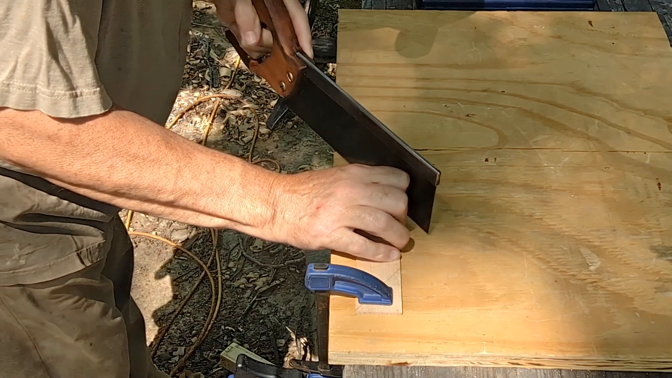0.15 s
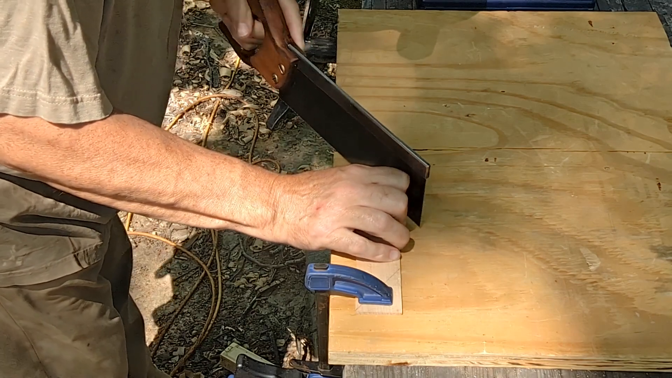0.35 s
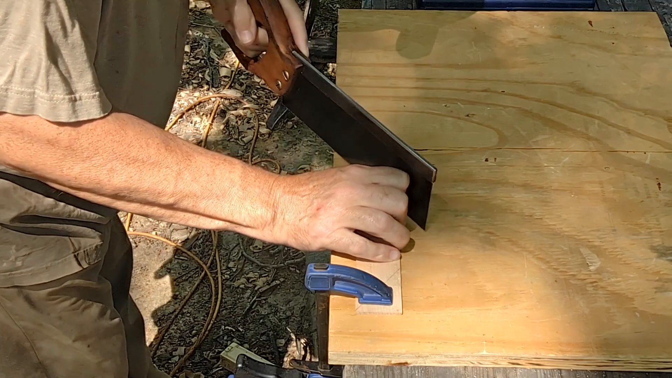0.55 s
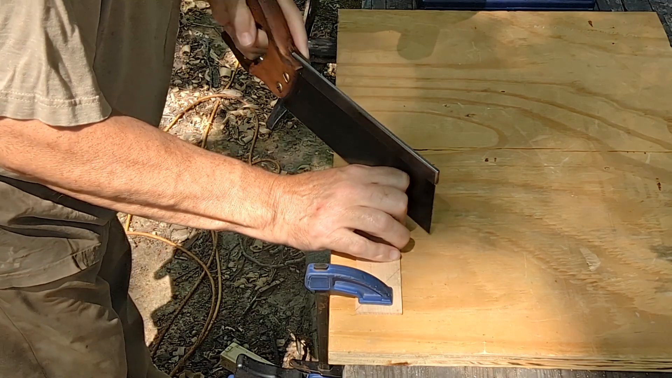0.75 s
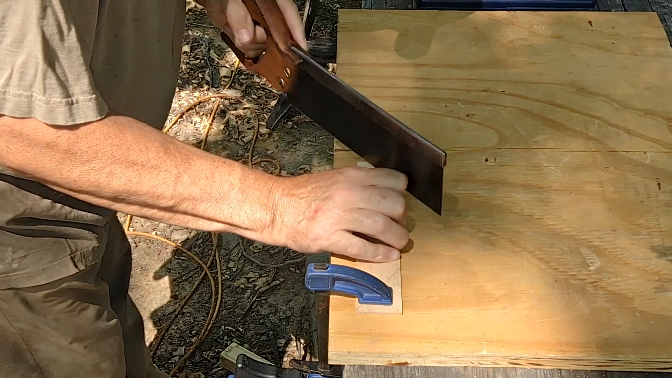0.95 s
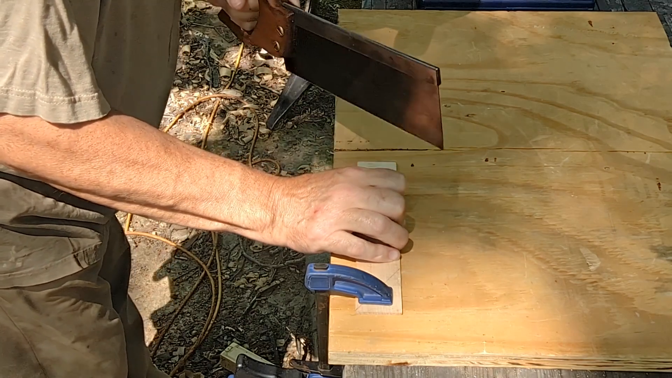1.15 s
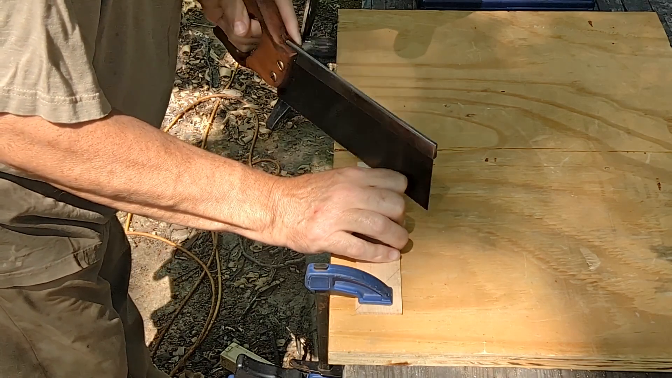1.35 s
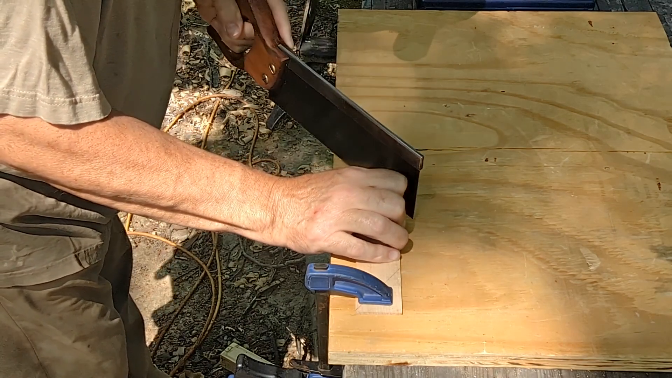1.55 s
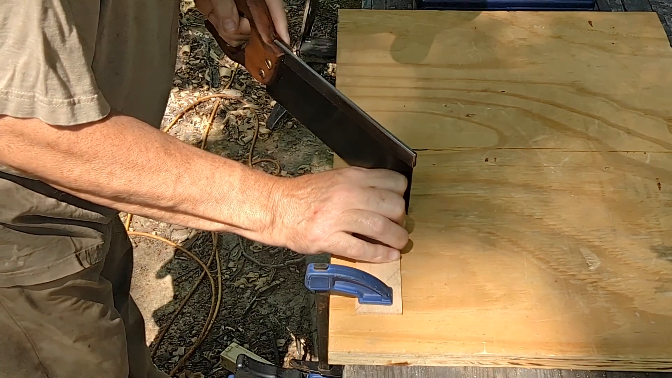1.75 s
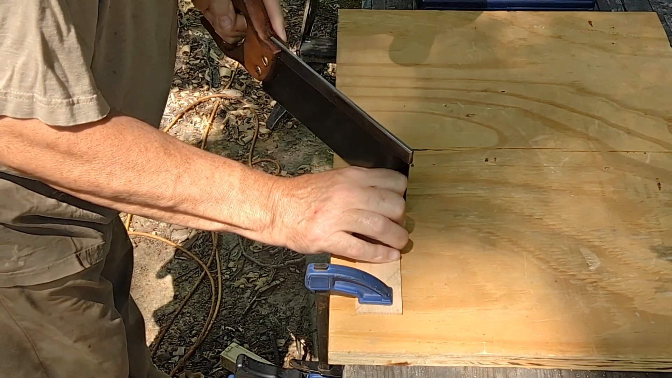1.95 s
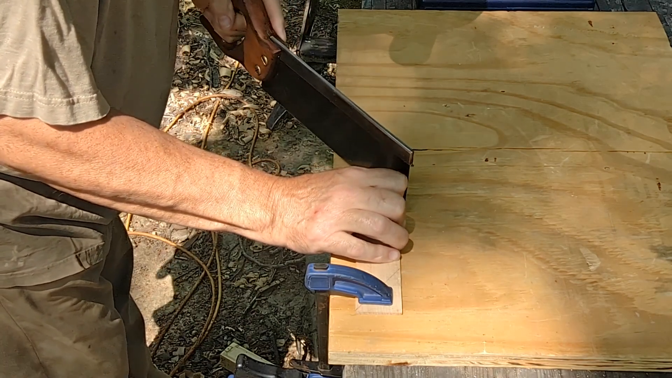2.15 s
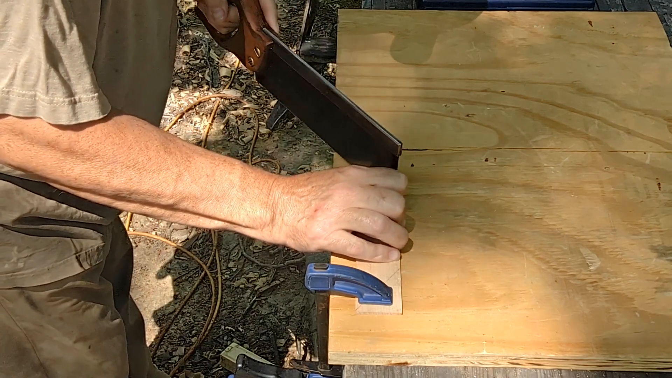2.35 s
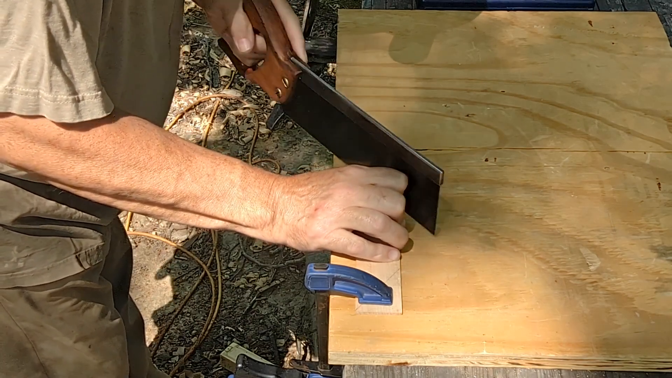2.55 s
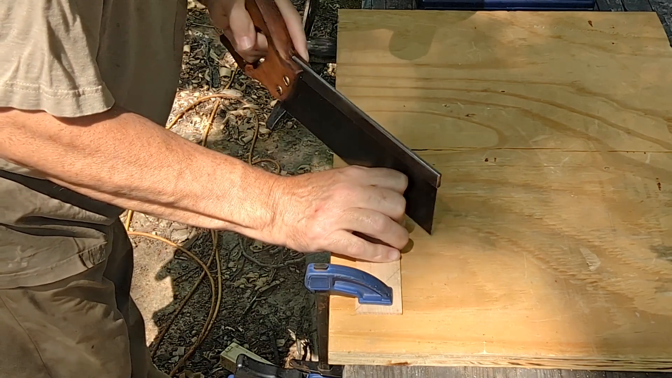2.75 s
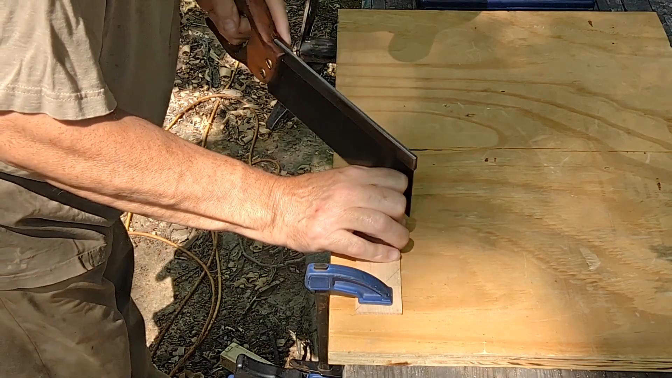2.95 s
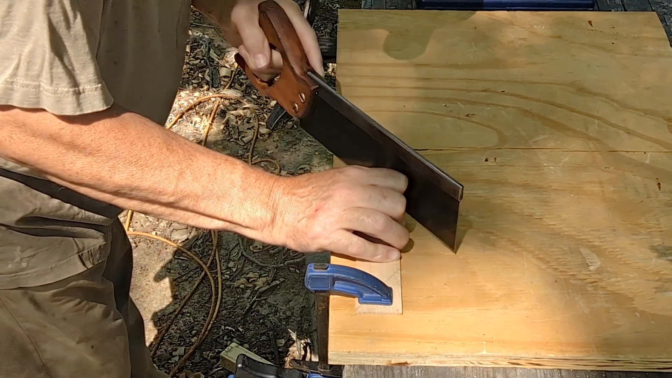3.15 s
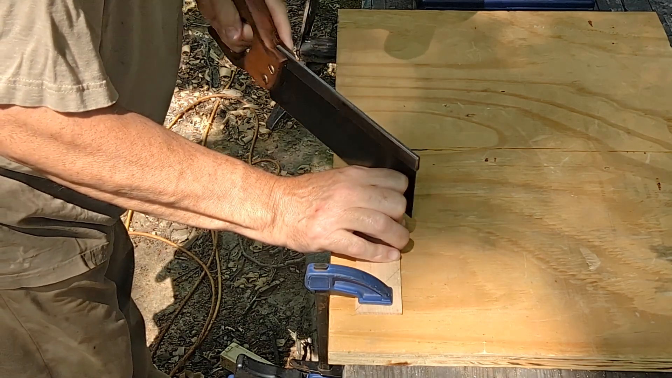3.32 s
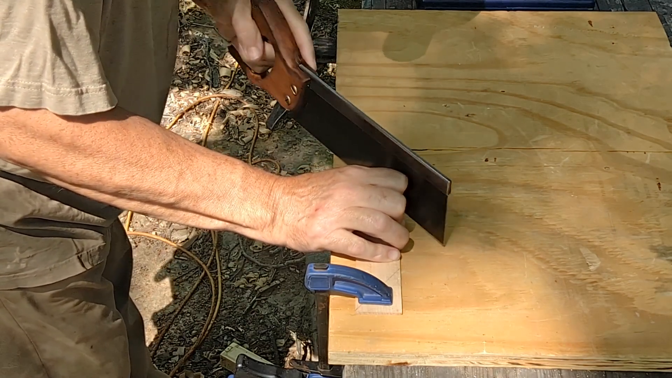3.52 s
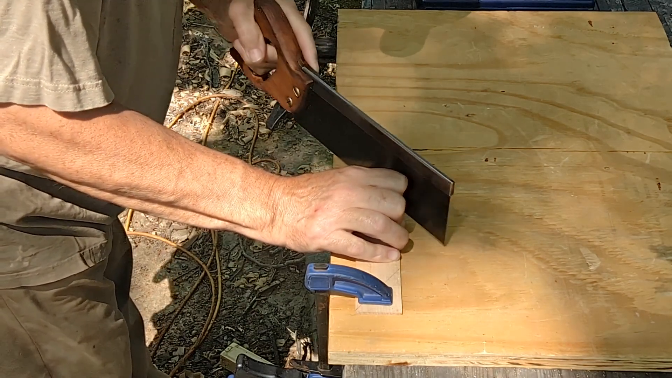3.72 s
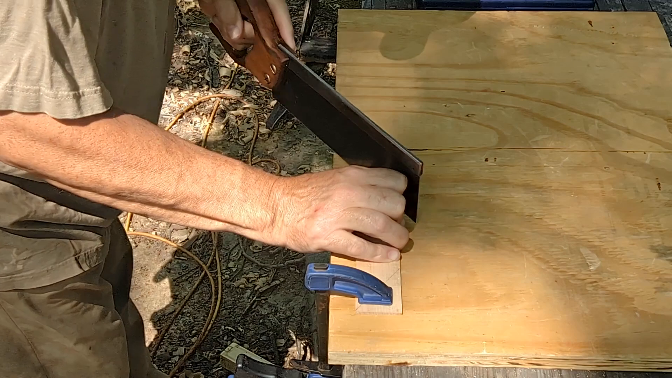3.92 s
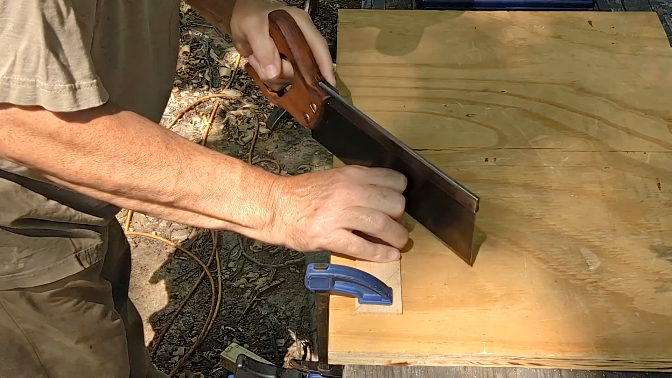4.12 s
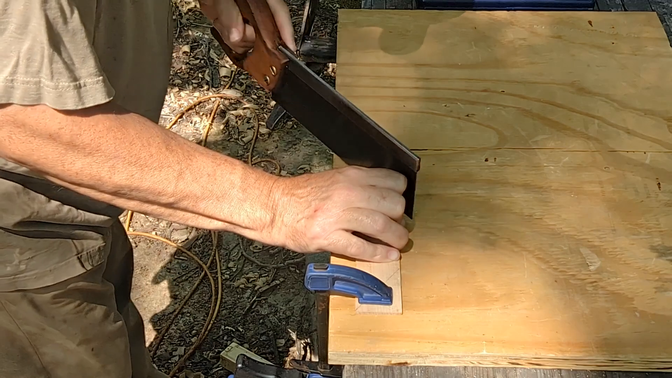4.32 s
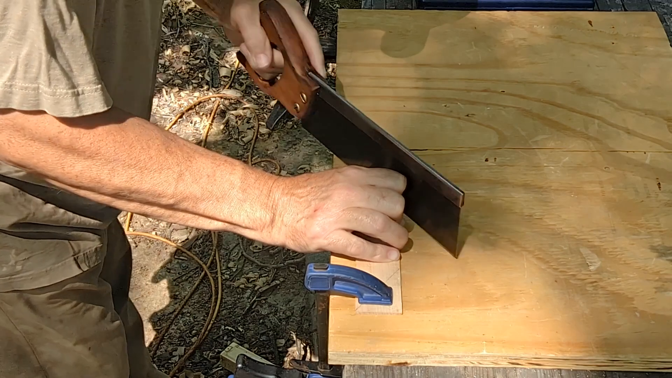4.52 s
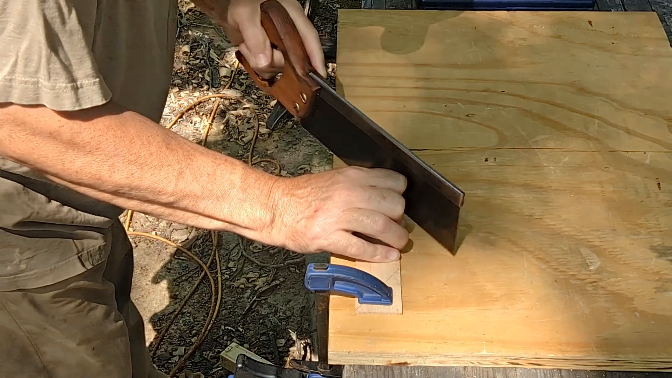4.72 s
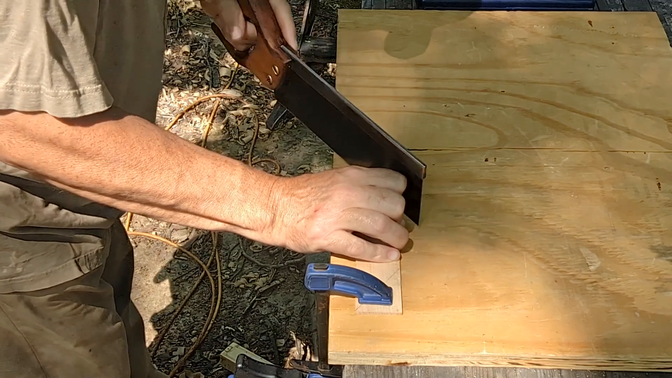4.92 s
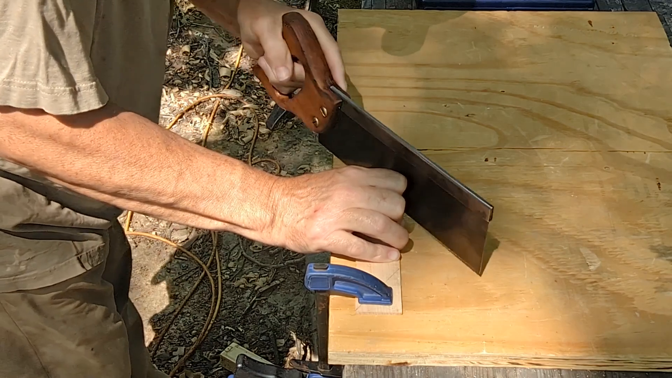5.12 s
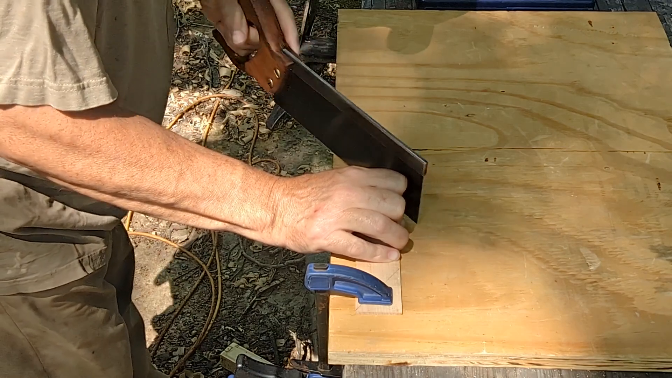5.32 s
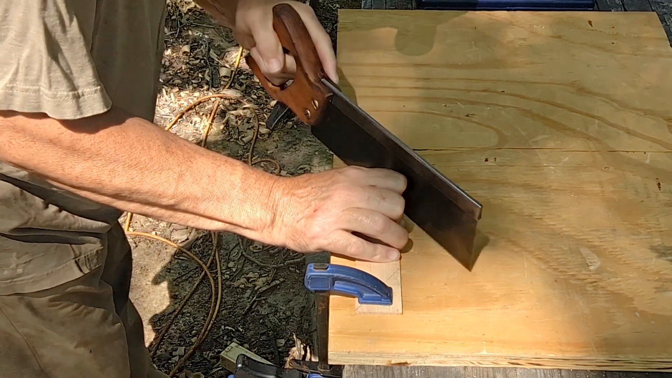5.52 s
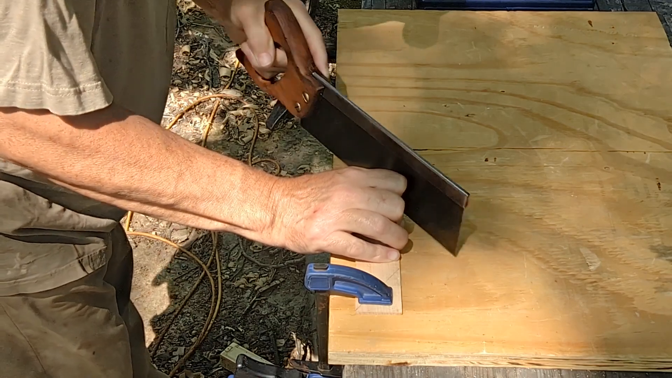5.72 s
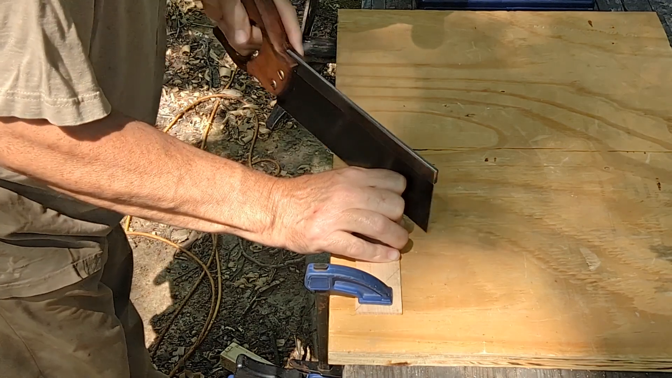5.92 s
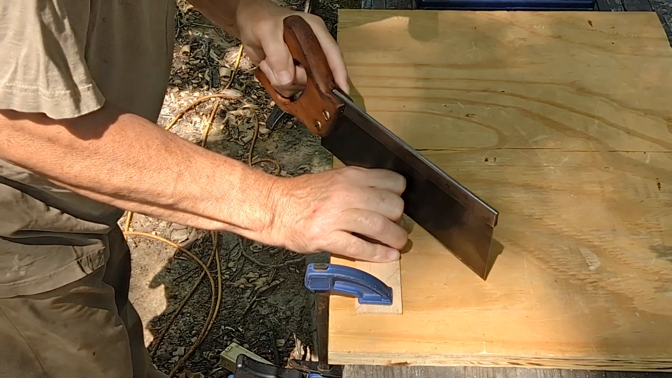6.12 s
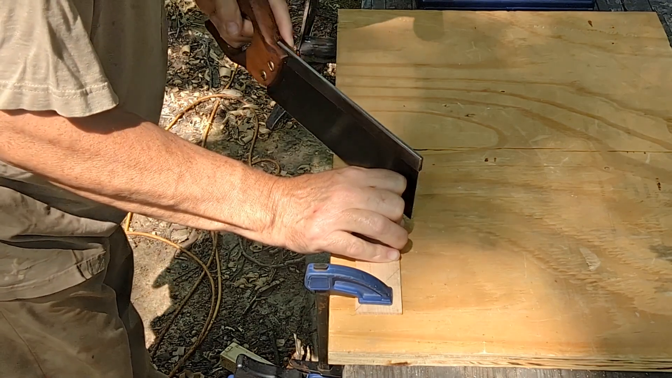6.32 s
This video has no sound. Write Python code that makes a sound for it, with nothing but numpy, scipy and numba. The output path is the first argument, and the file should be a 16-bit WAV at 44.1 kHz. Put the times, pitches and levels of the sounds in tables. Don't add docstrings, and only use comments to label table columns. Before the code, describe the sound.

A fine-toothed handsaw nicks a wood strip, pauses with light taps, then rasps in quick even strokes outdoors while cicadas throb.

```python
import sys
import numpy as np
from scipy import signal
from scipy.fft import rfft, irfft
from scipy.io import wavfile
from scipy.ndimage import uniform_filter1d
from numba import njit

SR = 44100
rng = np.random.default_rng(int(sys.argv[2]) if len(sys.argv) > 2 else 0)


def boost_factor(decibels):
    exponent = np.asarray(decibels, float) / 20
    return 10 ** exponent


def log_audio(samples):
    frames = np.atleast_2d(samples).T
    limited = np.clip(frames, -1, 1)
    pcm = np.round(limited * 32767).astype(np.int16)
    wavfile.write(sys.argv[1], SR, pcm)


N = 280917

# start in seconds, length in
# seconds, mid-stroke level in dB, lean from start to end in dB, shine of blade and edge in dB.
STARTING_STROKES = [
    (-0.144, 0.27, -45.5, 43.5, 2),
    (0.126, 0.3, -46.5, -36.0, -0.5),
    (0.288, 0.2, -36.0, 19.0, -0.5),
    (0.481, 0.228, -41.5, 6.0, 0.5),
    (0.683, 0.184, -31.5, 16.5, -1.5),
    (2.204, 0.17, -51.0, 12.0, -2),
]
# start in seconds, length in seconds, mid-stroke level in dB,
# lean from start to end in dB, shine of blade and edge in dB.
CUTTING_STROKES = [(2.412, 0.26, -35, 21.5, -0.5), (2.707, 0.27, -40, -13.5, -3),
                   (2.935, 0.24, -32.0, 9.5, -1), (3.194, 0.23, -38.0, 0, -1),
                   (3.405, 0.27, -33.5, -0.5, -1), (3.696, 0.25, -38.5, -13.0, 0.0),
                   (3.914, 0.23, -29.5, 7.0, -1), (4.167, 0.27, -36.5, 2.5, 0),
                   (4.41, 0.25, -31.5, 3.0, 0.5), (4.686, 0.25, -37.0, -3.0, 1.0),
                   (4.909, 0.248, -30.0, 16.5, -1), (5.171, 0.25, -37.5, 15.0, 2.0),
                   (5.41, 0.25, -29.0, 8.5, -1.5), (5.666, 0.26, -37.0, 1.0, 3),
                   (5.903, 0.24, -29, 10.0, -2), (6.14, 0.26, -34.5, 7, -0.5)]
# centre in seconds, extra level in dB, half length in seconds.
HARD_GRAIN = [(0.051, 3, .015), (.41, 4, .012), (0.808, 4, 0.014), (2.545, -4, .012), (2.604, 4, .02),
              (3.291, 3, .015), (3.376, 4, .015), (3.56, 2, .015), (3.771, 3, .015), (4.089, 3, .015),
              (4.391, 4, .012), (5.115, 3, .015), (5.314, 3, .015), (6.086, 3, 0.014)]

NICK = dict(steep=2.25, flat=.81, board_db=-1, dip_db=4.5,
            blade_db=-3.5, blade_fall_db=2.5, rasp_db=-10, rasp_fall_db=1.5)
PUSH = dict(steep=3.06, flat=1.36, board_db=0.5, dip_db=13,
            blade_db=-1, blade_fall_db=1, rasp_db=-7.5, rasp_fall_db=-1.5)
PULL = dict(steep=3.87, flat=1.68, board_db=-3.5, dip_db=9.5,
            blade_db=0.9, blade_fall_db=5.5, rasp_db=-9, rasp_fall_db=5.5)
DEEPENING_DB_PER_S = 1.05
END_DULL_DB = 7.5
RING_OUT_DB_PER_S = 493
RING_OUT_DB = (2, -6.5, -19)

# frequency in Hz, width in Hz, level in dB.
BOARD_MODES = [(170.5, 98, -9.5), (190, 59, -3), (273, 29, -5.5), (310.2, 9.6, -1), (368, 26, -4.5),
               (432.6, 23, 1.5)]
# frequency in Hz, width in Hz, level in dB.
STRIP_MODES = [(540, 36, -3), (639, 17.7, -0.5), (701, 60, -8), (813, 52.4, -5.5), (1075, 30, -16.5),
               (1179, 114, -7.5), (1303.3, 55, -0.5), (1331, 140, -4), (1558, 130, -7), (1678, 120, -9),
               (1930, 89, -7.5), (2128, 114, -17)]
# frequency in Hz, width in Hz, level in dB.
BLADE_MODES = [(2230, 1470, -12), (3320, 393, -0.5), (3760, 604, -0.5), (4125, 1710, -8.5)]
# frequency in Hz, width in Hz, level in dB.
EDGE_MODES = [(6020, 3700, -7.5), (6950, 440, 2), (7730, 2400, -9.5), (9600, 820, 0), (10670, 1530, -5.5),
              (11720, 790, 0), (12780, 730, -1), (13800, 1000, -10.5), (15250, 1050, -8)]
# frequency in Hz, unlike share from 0 to 1.
SAW_SPREAD = [(100, 0), (500, 0.13), (1500, 0.17), (3000, 0.23), (6000, 0.62), (12000, 0.68)]
# frequency in Hz, left minus right in dB.
SAW_PAN = [(60, 2), (110, 11), (200, 0), (380, -2), (700, -1), (1290, 1), (2380, 0), (4400, 0.5),
           (8120, -4), (15000, 7.5)]
# frequency in Hz, lead of the left port in radians.
SAW_LEAD = [(90, 0), (700, -.36), (1600, -1.1), (3300, -1.1), (6400, -2.7), (7300, -3.5), (9300, -3.3),
            (10500, -4), (11900, -6.3), (12700, -6.1), (16000, -9.5)]

# centre in seconds, judder in Hz, peak in dB, half length in seconds.
JUDDER = [(.07, 87.5, -34, 0.029), (0.218, 90.7, -36.5, 0.045), (0.434, 87.3, -32.5, 0.035),
          (.62, 87.06, -32, 0.038), (0.754, 103, -32.5, 0.037), (1.1, 101, -51.5, 0.077),
          (1.363, 102.1, -54, 0.034), (1.624, 101.1, -49, 0.04), (2.526, 114.7, -39, 0.05),
          (2.87, 91, -38, 0.042), (3.046, 94.8, -36, 0.058), (3.53, 123.2, -36.5, .04),
          (3.88, 92.2, -46.5, 0.11), (4.278, 103.9, -46, 0.046), (4.45, 104.8, -42, 0.045),
          (4.609, 117.2, -46, 0.044), (4.841, 89.9, -43, .035), (4.981, 114.6, -39.5, 0.056),
          (5.338, 94, -40, .045), (5.519, 114.7, -35.5, .045), (5.8, 107, -36, .045),
          (6.01, 122.9, -38, .05), (6.254, 108, -38.5, .05)]
JUDDER_SHIFT_DB, JUDDER_REST_DB = -1.5, -62.5
JUDDER_BOARD_DB = 9.5

# time in seconds, peak in dB, ring in Hz.
TAPS = [
    (1.589, -42, 728),
    (1.617, -41, 856),
    (1.637, -45, 960),
    (1.899, -41, 630),
    (3.949, -41, 1332),
    (5.445, -29.5, 549.5),
    (5.712, -34, 1291),
]
# time in seconds, level in dB.
THUDS = [
    (1.599, -39),
    (1.625, -47),
    (2.29, -39),
    (2.33, -42),
]

# frequency in Hz, width in Hz, level in dB.
CICADA_MODES = [(3670, 170, -8), (4330, 190, -1.5), (4860, 200, -6), (5260, 140, -.5), (6000, 600, -11),
                (6870, 450, -5.5), (8500, 1400, -15)]
# loudest moment in seconds, level in dB.
SWELLS = [
    (.6, -42.5),
    (2.12, -44),
    (3.419, -46.5),
    (4.86, -45.5),
    (6.36, -44.5),
]
# time from the loudest moment in seconds, level in dB.
SWELL_SHAPE = [(-0.49, -30), (-0.55, -23), (-0.27, -9), (0.035, -5), (0.22, -22), (.3, -35)]
CHORUS_DB = -69.5

# start in seconds, length in seconds, pitch in Hz, level in dB.
WHISTLE = [
    (1.972, .085, 2742, -70),
    (2.085, .085, 2738, -72),
    (2.07, .11, 1790, -74),
]

# frequency in Hz, level in dB per Hz.
AIR_SPECTRUM = [(30, -16), (70, 2.5), (105, -0.5), (140, -13), (200, -27), (320, -24.5), (800, -21),
                (1500, -25), (2500, -28), (4000, -25.5), (7000, -25), (8700, -35), (16000, -29.5)]
# frequency in Hz, unlike share from 0 to 1.
AIR_SPREAD = [(100, 0.04), (500, 0.6), (2000, 0.96), (8000, 1)]
# frequency in Hz, width in Hz, level in dB.
MACHINE_HUM = [(84, 3.8, -1), (103, 7, 1)]
AIR_DB, DRONE_DB = -62.5, -59


def level(x, db=0):
    return x * boost_factor(db) / np.sqrt(np.mean(x ** 2))


def track(rows, rest=None):
    s, *columns = np.transpose(rows)
    return [np.interp(np.arange(N) / SR, s, c, rest, rest) for c in columns]


def over_hz(table):
    hz, value = np.transpose(table)
    return np.interp(np.log(np.fft.rfftfreq(N, 1 / SR) + 1), np.log(hz + 1), value)


@njit
def svf(x, hz, width, stretch):
    y, b, l = np.empty(len(x)), 0., 0.
    rest, k = np.tan(np.pi * hz / SR), width / hz
    for i in range(len(x)):
        g = rest * stretch[i]
        v = (b + g * (x[i] - l)) / (1 + g * (g + k))
        b, l, y[i] = 2 * v - b, l + 2 * g * v, k * v
    return y


def ring(x, modes, drift=0., sway=None):
    stretch = 1 + drift + np.zeros(N)
    sway = np.ones(N) if sway is None else sway
    total = 0
    for k, (hz, width, db) in enumerate(modes):
        gain = (-1) ** k * boost_factor(db) * np.roll(sway, k * N // 13)
        total = total + gain * svf(x, 1. * hz, 1. * width, stretch)
    return total


def walk(rate):
    k = max(int(SR / rate), 1)
    held = np.repeat(rng.standard_normal(N // k + 1), k)
    return 1.3 * uniform_filter1d(uniform_filter1d(held, k), k)[:N]


def cycle(hz, jitter):
    return np.cumsum(hz * np.exp(jitter * walk(120)) / SR) % 1


def stereo(same, other, spread, lead=0., pan_db=0.):
    share = np.clip(over_hz(spread), 0, 1) / 2
    mid, side = rfft(same) * np.sqrt(1 - share), rfft(other) * np.sqrt(share)
    left = (mid + side) * np.exp(1j * lead) * boost_factor(pan_db / 2)
    right = (mid - side) * boost_factor(-pan_db / 2)
    return np.array([irfft(left, N), irfft(right, N)])


def strokes():
    t = np.arange(N) / SR
    curves = np.zeros((4, N))
    curves[0] = -95
    rows = [(NICK, r) for r in STARTING_STROKES]
    rows += [((PUSH, PULL)[k % 2], r) for k, r in enumerate(CUTTING_STROKES)]
    for grip, (start, length, db, lean_db, shine_db) in rows:
        along = (t - start) / length
        at = (along > 0) & (along < 1)
        speed, ahead = np.sin(np.pi * along[at]), along[at] - .5
        arch = np.tanh(grip["flat"] * speed) / np.tanh(grip["flat"])
        shine_db = shine_db - END_DULL_DB * along[at] ** 6
        depth_db = DEEPENING_DB_PER_S * max(start - CUTTING_STROKES[0][0], 0)
        curves[:, at] = (db + grip["steep"] * 20 * np.log10(arch + .01) + lean_db * ahead,
                         grip["board_db"] - grip["dip_db"] * speed ** 2,
                         grip["blade_db"] + shine_db - grip["blade_fall_db"] * ahead,
                         grip["rasp_db"] + shine_db + depth_db - grip["rasp_fall_db"] * ahead)
    curves[0] += sum(db * np.exp(-((t - s) / half) ** 2) for s, db, half in HARD_GRAIN)
    ringing = np.maximum.accumulate(curves[0] + RING_OUT_DB_PER_S * t) - RING_OUT_DB_PER_S * t
    curves[1:, ringing > curves[0] + 3] = np.reshape(RING_OUT_DB, (-1, 1))
    return np.r_[[ringing], curves[1:]]


def fibres(gate, crack_db, patchy_db):
    sizes = boost_factor(crack_db * rng.exponential(size=N) + patchy_db * walk(90))
    return level(gate * sizes * rng.standard_normal(N))


def saw(catch):
    wood_db, board_db, blade_db, rasp_db = uniform_filter1d(strokes(), int(0.0082 * SR))
    teeth = cycle(320 * boost_factor(.3 * (wood_db + 30)), jitter=.1)
    gate = (1 + 0.34 * np.exp(-teeth / 1.3)) * (1 + catch)
    bite = level(np.diff(teeth, prepend=0), -11.0) * boost_factor(3.66 * walk(30))
    drift = 0.011 * walk(6)
    sway = boost_factor(2.8 * walk(18))
    bright = boost_factor(np.clip(0.13 * (wood_db + 40.5), -4, 4))
    drum_db = board_db + JUDDER_BOARD_DB * uniform_filter1d(catch, SR // 40) - 1.5
    pair = []
    for _ in range(2):
        tear = fibres(gate, crack_db=2.1, patchy_db=1.0) + bite
        board = level(ring(tear, BOARD_MODES, sway=sway), -0.21) * boost_factor(drum_db)
        steel = ring(tear, BLADE_MODES, drift, sway ** 0.34)
        blade = level(ring(steel, [(3300, 23000, 0)]), -0.23) * boost_factor(blade_db)
        scrape = fibres(gate, crack_db=-3.0, patchy_db=1.57)
        edge = ring(scrape, EDGE_MODES, drift / 3, boost_factor(1.25 * walk(150)))
        rasp = level(edge, 2.34) * boost_factor(rasp_db)
        dull = ring(tear, STRIP_MODES[:5], drift, sway)
        sharp = ring(tear, STRIP_MODES[5:], drift, sway[::-1])
        wood = (dull / bright + sharp * bright) / np.std(dull + sharp)
        pair.append(boost_factor(wood_db) * (wood + board + blade + rasp))
    return stereo(*pair, SAW_SPREAD, over_hz(SAW_LEAD), over_hz(SAW_PAN))


def bench():
    t, hz = np.arange(N) / SR, track(JUDDER)[0]
    bursts = [top + JUDDER_SHIFT_DB - 6 * ((t - s) / half) ** 2 for s, _, top, half in JUDDER]
    db = np.maximum(np.max(bursts, axis=0), JUDDER_REST_DB)
    phase = cycle(hz, jitter=.03)
    tone = np.sin(2 * np.pi * phase) + 0.24 * np.sin(4 * np.pi * phase)
    rumble = rng.standard_normal(N)
    for _ in range(2):
        rumble = svf(rumble, 97.0, 72.0, hz / 100)
    shake = boost_factor(db) * (level(tone, -5.0) + level(rumble, -2.5))
    strength = np.clip((db + 51.0) / 12, 0, 1)
    catch = 0.81 * strength * np.exp(-phase / 0.18)
    return shake, catch


def taps():
    ticks, notes = np.zeros((2, N))
    t = np.arange(int(.04 * SR)) / SR
    for s, db, hz in TAPS:
        at = slice(int(s * SR), int(s * SR) + len(t))
        ticks[at] += boost_factor(db) * rng.standard_normal(len(t)) * np.exp(-t / .0025)
        notes[at] += boost_factor(db - 6.5) * np.sin(2 * np.pi * hz * t) * np.exp(-t / .006)
    wood = boost_factor(11.5) * ring(ticks, [*BOARD_MODES, *STRIP_MODES])
    return notes + wood + boost_factor(2.5) * ring(ticks, BLADE_MODES)


def thuds():
    push = np.zeros(N)
    for s, db in THUDS:
        push[int(s * SR)] = boost_factor(db + 45.5)
    return ring(uniform_filter1d(push, int(0.0021 * SR)), BOARD_MODES)


def cicadas():
    throb = np.exp(-cycle(55. + 4 * walk(3), jitter=.04) / .55)
    swells = [track([(s + lag, db + down) for lag, down in SWELL_SHAPE], -102)[0] for s, db in SWELLS]
    swell_db = np.max(swells, axis=0)
    pair = []
    for _ in range(2):
        chorus = level(ring(rng.standard_normal(N) * (1 + 0.27 * throb), CICADA_MODES))
        far = chorus * (boost_factor(CHORUS_DB) + boost_factor(swell_db - 4.5))
        near = level(ring(rng.standard_normal(N) * throb, CICADA_MODES)) * boost_factor(swell_db - 1)
        pair.append(far + near)
    return stereo(*pair, AIR_SPREAD)


def whistle():
    t = np.arange(N) / SR
    notes = np.zeros(N)
    for s, length, hz, db in WHISTLE:
        sounding = 1. * ((t > s) & (t < s + length))
        envelope = uniform_filter1d(sounding, int(.018 * SR))
        notes += boost_factor(db) * envelope * np.sin(2 * np.pi * hz * t)
    return np.sqrt(2) * notes * boost_factor(2.5 * walk(41.2))


def air():
    pair = [irfft(rfft(rng.standard_normal(N)) * boost_factor(over_hz(AIR_SPECTRUM)), N) for _ in range(2)]
    band = signal.butter(4, [150, 3000], "band", fs=SR, output="sos")
    mids = signal.sosfilt(band, pair[0])
    hiss = stereo(*pair, AIR_SPREAD) * boost_factor(AIR_DB + 1.2 * walk(2.915)) / np.std(mids)
    mains = boost_factor(DRONE_DB + 1.1 * walk(5.8)) * np.sin(2 * np.pi * 59.5 * np.arange(N) / SR)
    machine = level(ring(rng.standard_normal(N), MACHINE_HUM), -56.5)
    return hiss + mains + machine


def scene():
    shake, catch = bench()
    sides = boost_factor([[-.3], [.3]])
    return saw(catch) + shake * sides + taps() + thuds() + cicadas() + whistle() + air()


def low_pass(x):
    return signal.sosfilt(signal.butter(12, 16760, fs=SR, output="sos"), x)


def record(dry):
    bass = signal.butter(2, 52, "high", fs=SR, output="sos")
    top = signal.ellip(16, .2, 115, 15730, fs=SR, output="sos")
    mix = signal.sosfilt(np.r_[bass, top], dry)
    return low_pass(mix)


dry = scene()
out = record(dry)
log_audio(out)
```